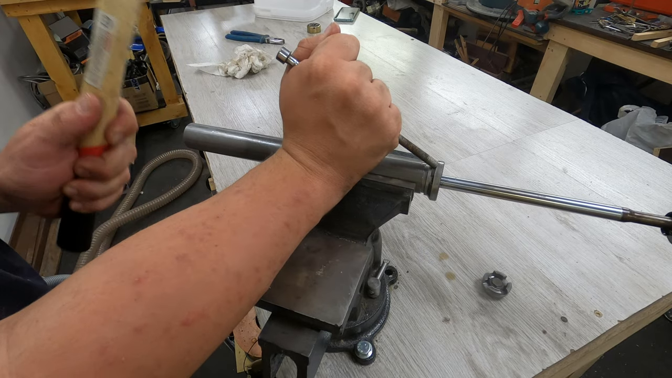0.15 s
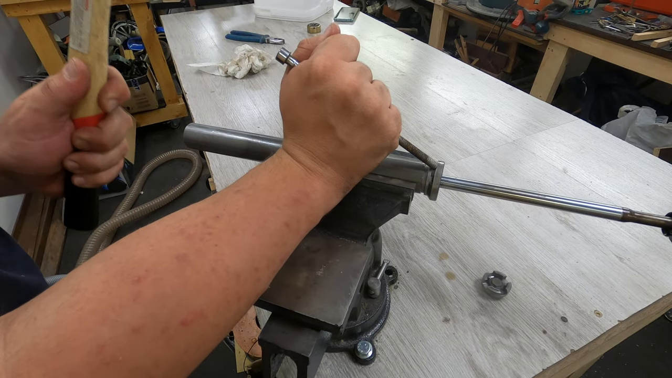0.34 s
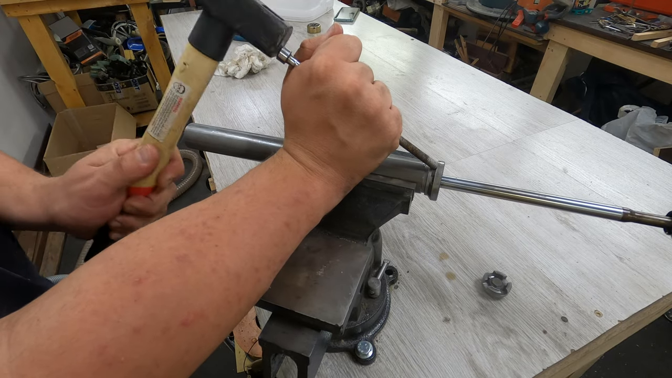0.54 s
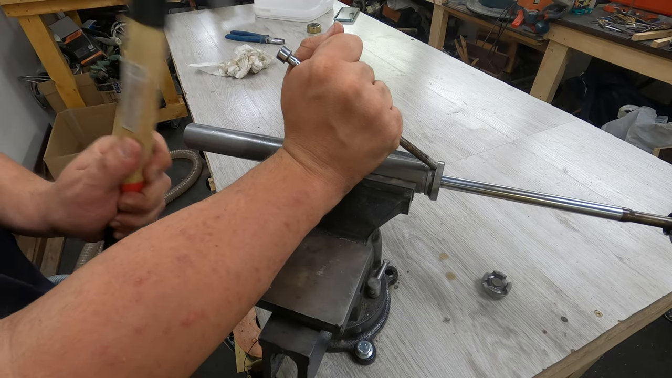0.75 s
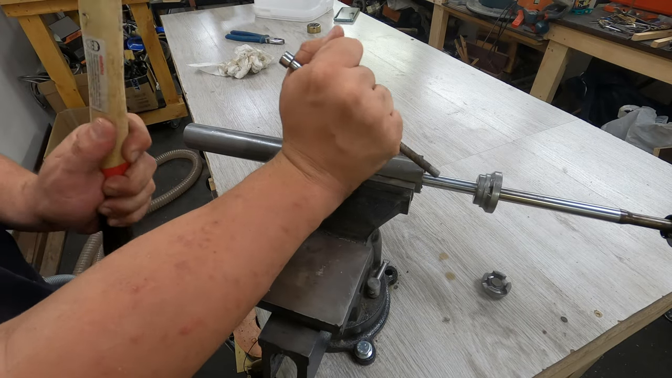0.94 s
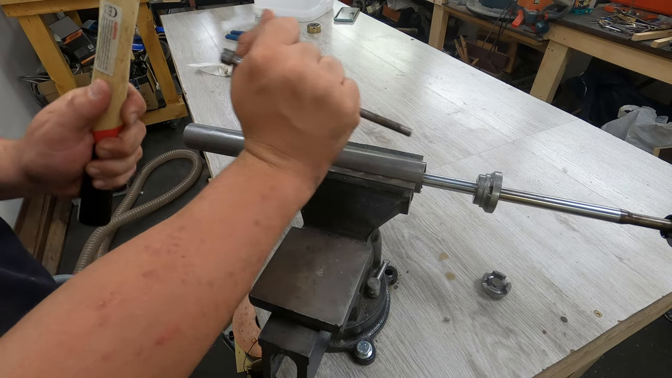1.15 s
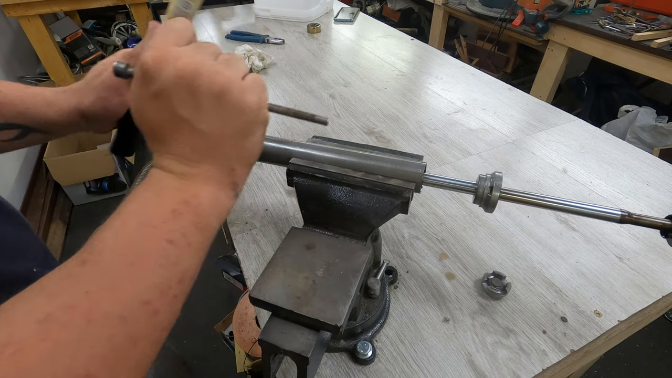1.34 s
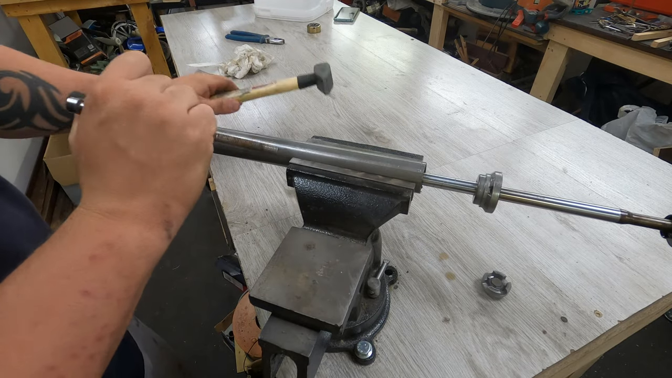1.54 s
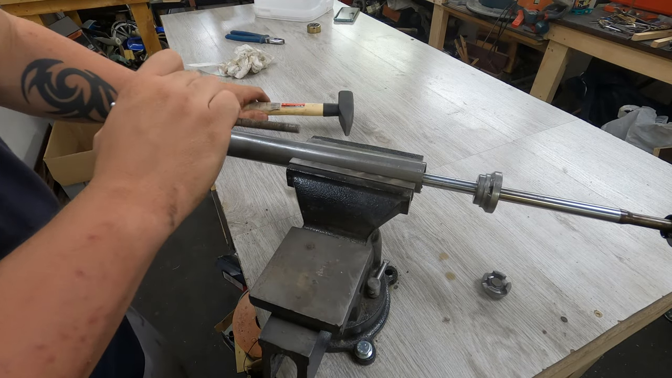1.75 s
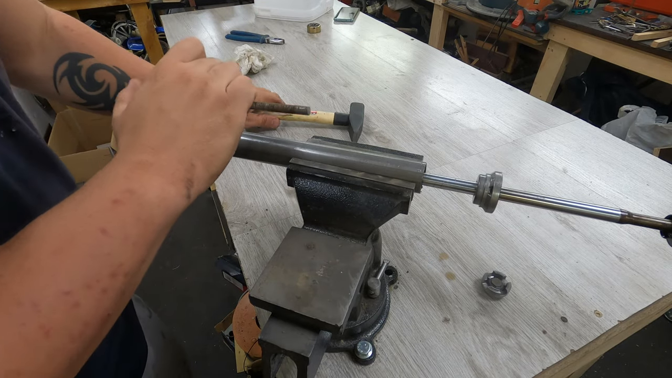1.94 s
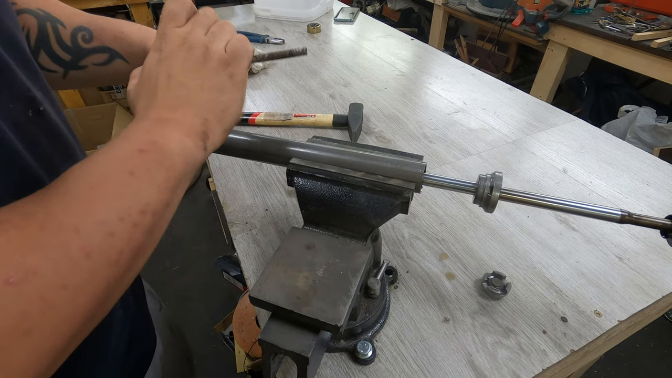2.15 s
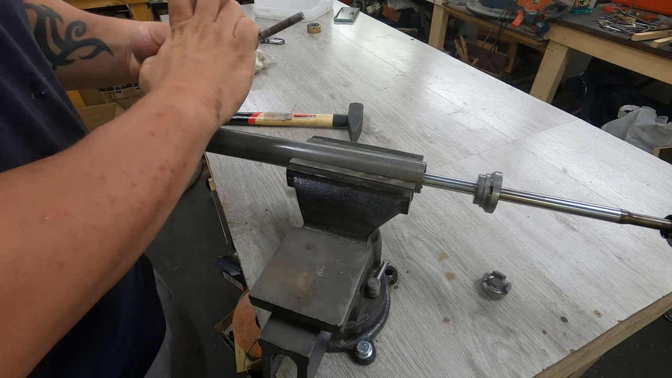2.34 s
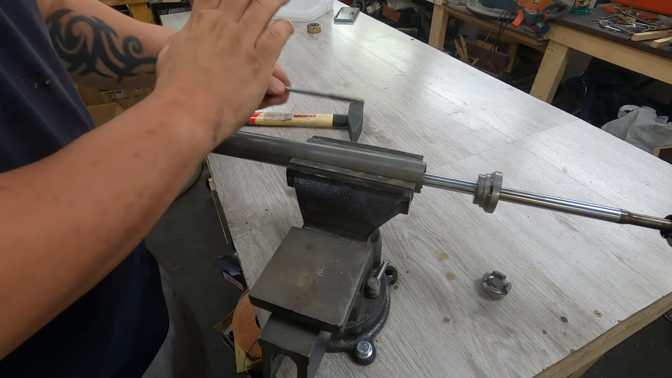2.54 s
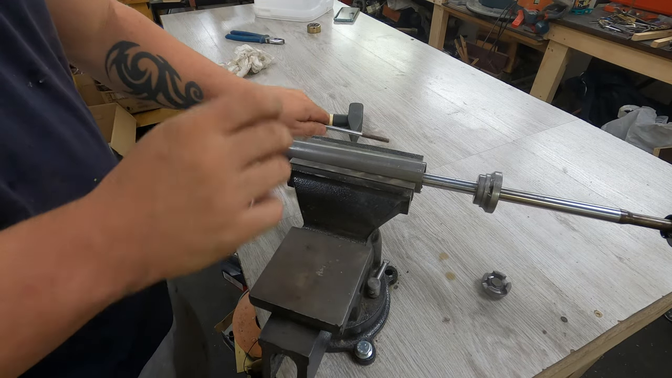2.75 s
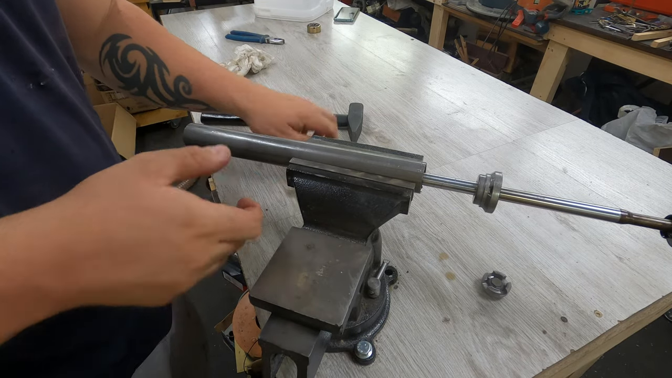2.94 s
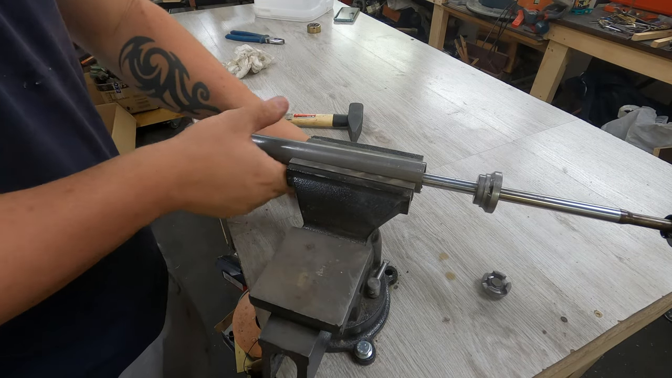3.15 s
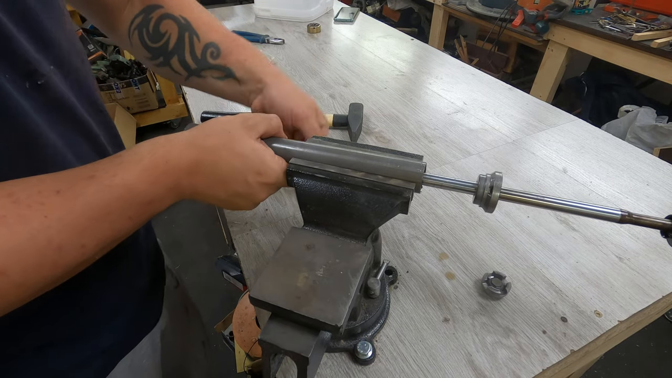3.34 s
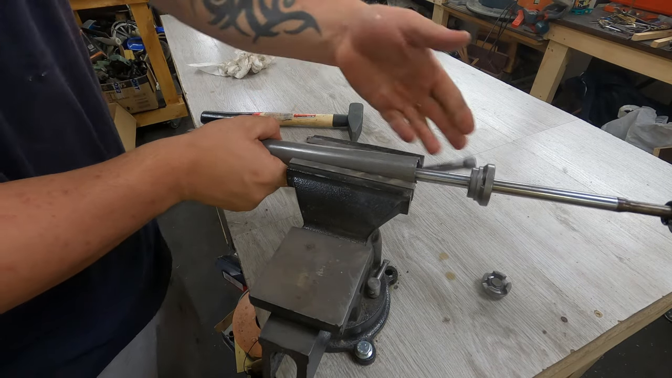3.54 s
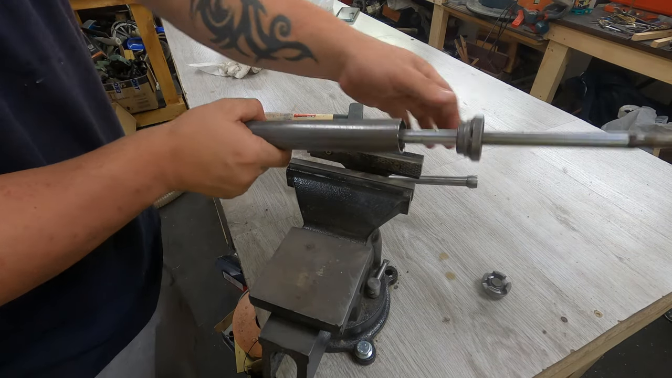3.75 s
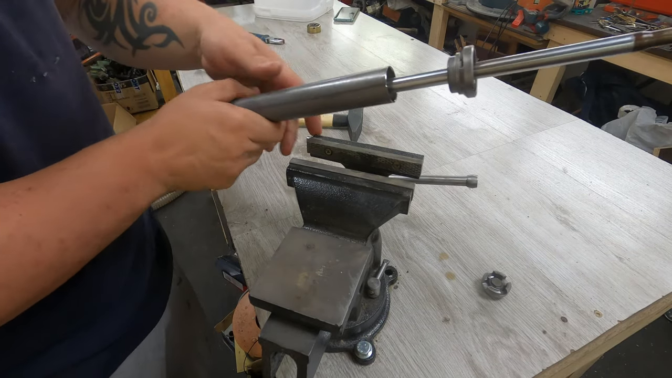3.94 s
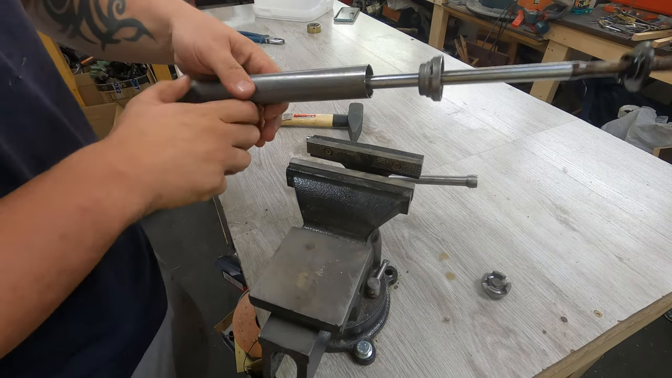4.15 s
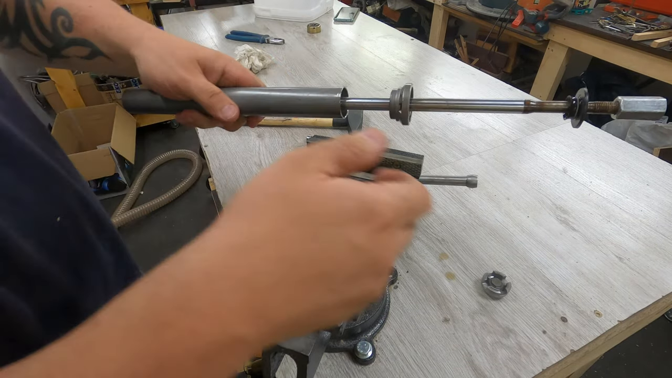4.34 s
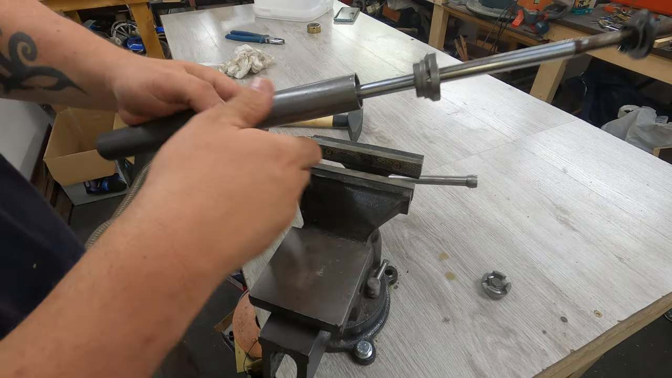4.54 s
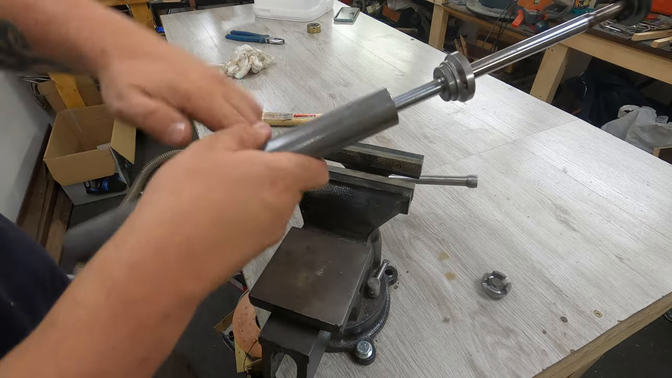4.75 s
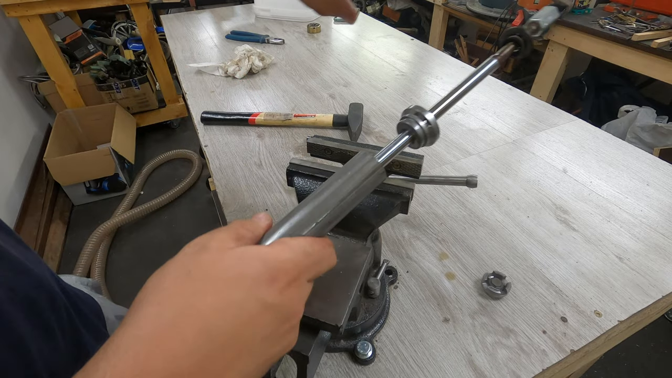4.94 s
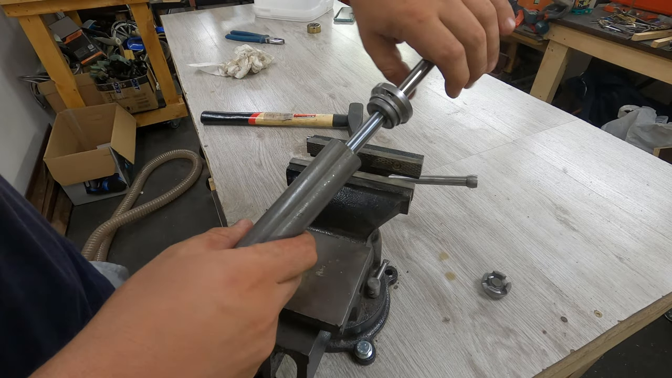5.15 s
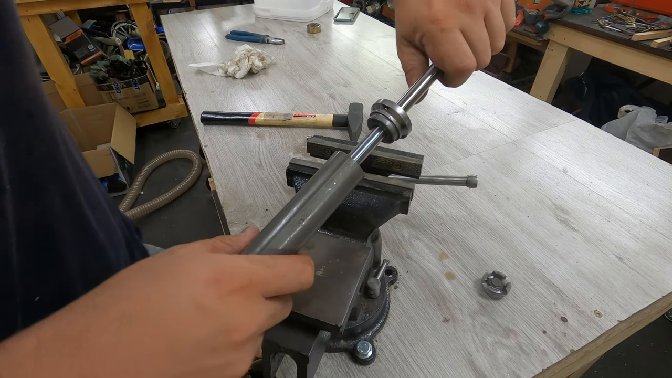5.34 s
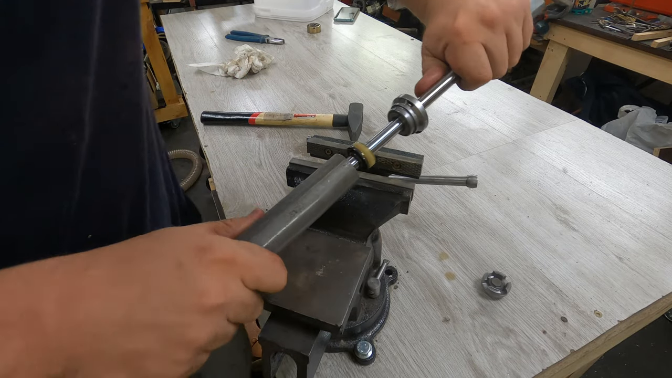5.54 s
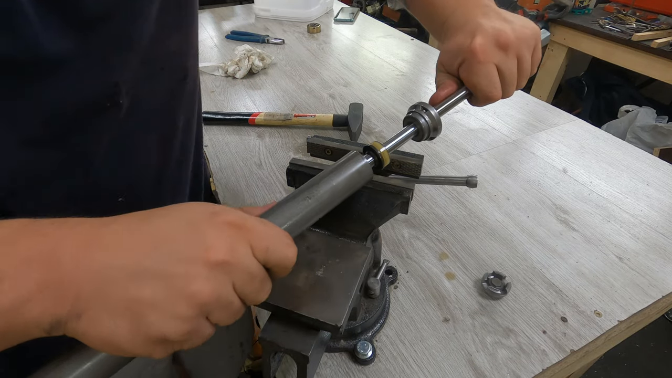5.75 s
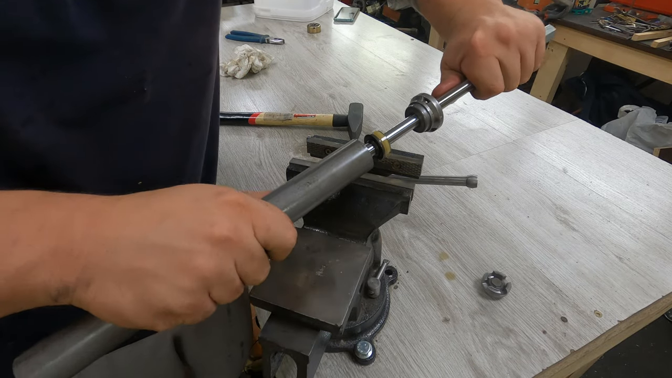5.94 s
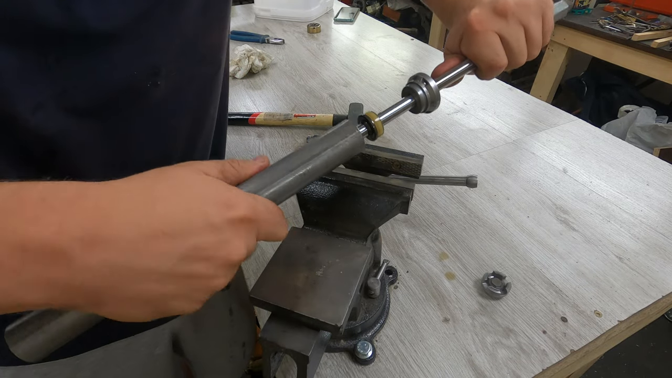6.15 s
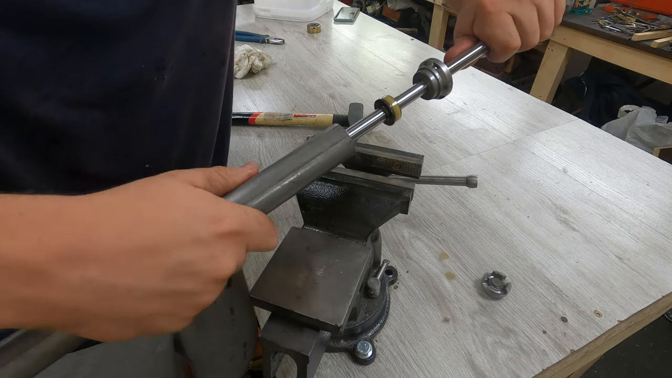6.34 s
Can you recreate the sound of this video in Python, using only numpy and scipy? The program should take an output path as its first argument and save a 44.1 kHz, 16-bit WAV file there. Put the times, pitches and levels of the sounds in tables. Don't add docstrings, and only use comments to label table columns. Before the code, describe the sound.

Close stereo in a small, hard-walled workshop with a low wavering hum and faint air hiss. The tail of a hammer blow opens the scene; a full crack of punch on steel tube lands at 0.13 s, a duller glancing one at 0.65 and another hard one at 0.89 with quick skips, each with steel ring, bench thud and brief room tail. At 1.9-2.1 the hammer shaft knocks down, then its head at 2.1 with small bounces. The punch clatters down at 2.9-3.1. Light handle knocks at 3.25 precede a gritty, rumbling scrape from the vise at 3.55-3.75. Hands then rub softly over steel with faint ticks and pings. A tiny high squeak comes around 5.1-5.3, while a muffled engine passes outside from about 5, strongest near 5.6. The rod's oily hiss swells at 5.84, briefly pulls again at 6.03 and fades, leaving quiet rubbing and hum.

```python
import sys
import numpy as np
from scipy import signal
from scipy.fft import rfft, irfft, next_fast_len
from scipy.io import wavfile

SR = 44100
rng = np.random.default_rng(int(sys.argv[2]) if len(sys.argv) > 2 else 0)


def bounce(signal):
    frames = np.transpose(np.atleast_2d(signal))
    limited = np.clip(frames, -1, 1)
    pcm = np.round(limited * 32767).astype(np.int16)
    wavfile.write(sys.argv[1], SR, pcm)


def convert_level_to_amplitude(level_db):
    exponent = np.asarray(level_db, float) / 20
    return 10 ** exponent


N = 286202
LEAD = 6000

# start in seconds, crack level in dB, then bench thud,
# low crack and steel ring in dB relative to the crack.
FIRST_BLOW = [
    (0.131, -15, 0.5, -14.5, 5),
    (0.629, -71.5, -8.5, -7.5, -9.5),
    (0.6392, -64.5, -7.5, -1, -13.5),
]
GLANCING_BLOWS = [
    (-0.051, -27.5, 1.5, -10, 4.8),
    (0.65, -18.5, -6, -12.5, 2.5),
]
LAST_BLOW = [
    (0.865, -64.5, -13.5, -12.5, -9.5),
    (0.875, -57.5, -5, 2, -3),
    (0.8856, -13.5, -4, -12, 3.5),
]
REBOUNDS = [
    (0.9082, -24.5, -12, -32, 5),
    (0.9105, -36, -13.5, -30.5, 6.5),
    (1.0105, -34, -31, -11, -2),
]
SHAFT_DOWN = [
    (1.8017, -63.5, -16, -7.5, -25.5),
    (1.9348, -66, 14, 3, 20),
    (1.9442, -23.5, 6, -3, 12),
    (1.9788, -29, 12, 3, 19),
    (1.9884, -42.5, -1, 18, 19.5),
    (2.0239, -37.5, 18.5, -18.5, 19.5),
    (2.0744, -49.5, 11.5, -5, 10),
]
HEAD_DOWN = [
    (2.1118, -16, -4, -5, 2.5),
    (2.1712, -24.5, -1, -2, 7.5),
    (2.177, -27, -6, 2, -7),
    (2.2081, -32, 4, 1, 12),
    (2.232, -38.5, -2.5, -1.5, 9.5),
]
PUNCH_DOWN = [
    (2.8841, -55, 7, -3.5, 18),
    (2.8955, -27.5, -4.5, -5.5, 5),
    (2.9558, -20, -5.5, -10.5, -19),
    (2.958, -15, -20, -6, -26),
    (3.0135, -24.5, -12.5, -11, -25),
    (3.0215, -21.5, -43, -4.5, -8.5),
    (3.027, -24, -9.5, -13, -22),
    (3.0495, -23.5, -30, -11, -30),
    (3.08, -32.5, -30, -14, -20),
]
HANDLE_KNOCKS = [
    (3.2252, -56, 7.5, 1, 6),
    (3.2584, -50, 3.5, 0, 14),
    (3.26, -47.5, -17, 5.5, 14.5),
]
ROD_TICKS = [
    (3.5535, -50, -30, 2, -10),
    (3.5711, -44.5, -28, -1.5, -8),
    (3.6325, -40, -19, 3, -17),
    (3.7205, -52.5, -22, -7, -1),
    (3.7575, -59, -30.5, -23, -10),
    (4.004, -65.5, -39.5, -9, -11),
    (4.2053, -56, -39, -21.5, -18),
]
COLLAR_TICKS = [
    (5.2312, -65.5, -9, -7, 17),
    (5.243, -68, -30, 2, 13),
    (5.2914, -73, -30, -3, 3),
    (5.3995, -56.5, -18, -8, -1),
    (5.6177, -49.5, -23, -21, -2.5),
    (6.0105, -51.5, -34, -22, 5),
    (6.2098, -64, -40, -20, -25),
]

# mode in Hz, level in dB, time to fall 60 dB in seconds.
BENCH = [(40.4, -13.5, 0.061), (96, -6, 0.073), (155, -9, 0.17), (175, -1.5, 0.1), (204.7, -3.5, 0.15),
         (233, -5.5, 0.1), (315, -2.5, 0.053), (456, -2, 0.014), (510, -10.5, 0.021)]
TUBE = [(1340, -50, 1.4), (2220, -31, .3), (4070, -40, .3), (4092, -29, .5), (5590, -32, .15),
        (7400, -28, .06)]
SKIPPED_STEEL = [(3400, -7.5, .03), (4600, 2, .025), (4716, -1.5, .03), (5640, -1.5, .02), (7110, -5, .015)]
HAMMER_SHAFT = [(509, 8, 0.017), (699, -25, 0.038), (747, -15, 0.033), (960, -10, 0.057), (1148, -13, 0.11),
                (1440, -9.5, 0.027), (2120, -31.5, .04)]
HAMMER_HEAD = [(573, -5.5, 0.091), (1090, -9.5, 0.073), (1670, -3, .1), (3900, -22, 0.36), (4310, 3, 0.01),
               (5170, -13.5, .08)]
PUNCH = [(2900, -9, .05), (5440, -3, .075), (9055, -17, .2), (9110, -18, .14), (13100, -28, .16),
         (15000, -39, .12)]
HANDLE = [(1798, -3, .04), (2450, 0, .03), (3380, -8, .02), (4440, -3, .025), (6000, -14, .02)]
ROD = [(2230, -6, .06), (4450, -9, .07), (5980, -12, .065)]
COLLAR = [(1500, -20, 0.024), (2580, 2.5, 0.019), (5000, -36, 0.022)]
JAWS = [(631, 4, 0.037), (910, -17.5, 0.079), (1257, 0, 0.038), (1445, -10, 0.045), (2140, -7, 0.065),
        (2650, -18, 0.06), (4100, -11, 0.037)]

# centre in Hz, width in Hz, boost in dB.
TINT_FIRST = [(1070, 150, 9), (2130, 500, 6.5), (4100, 300, 5), (5300, 460, 2), (7600, 400, 4),
              (10000, 400, 7.5)]
TINT_GLANCING = [(1320, 120, 6.9), (2116, 170, 5), (3482, 300, 2), (4410, 300, 2), (5500, 400, 4.7),
                 (7240, 840, 5.7)]
TINT_LAST = [(1690, 300, 3), (2100, 130, 3), (3300, 400, 2.6), (4600, 500, 2.5), (5240, 500, 3),
             (7400, 310, 8.8)]
TINT_HEAD = [(1760, 83, 6.2), (2450, 250, 3), (2950, 250, 2.5), (3780, 708, 9.8), (5440, 370, 3.6),
             (9370, 500, 6.6)]
TINT_PUNCH = [(1023, 170, 1.2), (1564, 163, 6.5), (2100, 160, 1.84), (3000, 980, 6.8), (4300, 1000, 1),
              (5500, 410, 2.5)]

# start in seconds, Hz, dB, swell
# in ms.
PINGS = [(2.962, 9070, -46, 19), (3.03, 9080, -50, 16), (3.085, 9070, -51.5, 14.5),
         (3.0275, 2820, -20, 1.5), (3.2615, 1363, -29.5, 5.3), (3.57, 2140, -45, 11),
         (3.565, 1264, -43, 4.7), (3.662, 2650, -40, 3.6), (3.668, 3080, -44, 2.9), (3.72, 4800, -52, 3.4),
         (3.73, 2450, -52, 1.7), (3.757, 3960, -59.5, 4.5), (3.765, 2340, -62, 5), (3.757, 6550, -61, 4),
         (4.7, 3930, -57, 4.5), (4.702, 4600, -59, 4.4), (4.725, 4470, -61, 8.7), (4.746, 5920, -58.5, 5.5),
         (4.758, 2280, -64, 4.3), (4.774, 2230, -50.5, 3.1), (4.8, 5980, -66, 9.4), (4.82, 6000, -63, 6.9),
         (4.822, 4480, -67, 7.4), (5.229, 4900, -59, 2), (5.243, 4300, -61, 3.6), (5.238, 1520, -57, 3),
         (5.288, 1550, -60, 2.3)]
# start in seconds, Hz, dB, swell in ms.
BUMPS = [(.652, 318.7, -17.5, 5.8), (1.98, 200.9, -20, 6.5), (1.998, 204, -18, 6), (2.022, 175, -14.5, 8),
         (2.075, 118, -25.5, 7.1), (2.112, 510, -18, 5), (2.172, 507, -26, 6.6), (2.896, 539, -27.5, 3.8),
         (2.965, 333, -22, 3.6), (3.685, 602, -44, 9.5), (3.72, 960, -48, 6.6), (3.568, 229, -34, 6.6),
         (3.612, 253, -33, 3.2), (3.652, 193.5, -29, 5.7), (3.666, 242, -30, 3.5)]
# delay in seconds, Hz, dB relative to the blow, swell in ms.
ROCKS = [
    (.028, 172, -12, 6),
    (.062, 181, -9, 6),
    (0.099, 172, -14.5, 7),
]
# start in seconds, level in dB.
ROCKED_BY = [
    (-.051, -27.5),
    (.131, -11),
    (.65, -16),
    (0.8862, -13),
]

# peak in seconds, bench rumble in dB, rise and fall in seconds.
DRAG = [
    (3.552, -34.5, 0.0094, 0.11),
    (3.62, -27.5, 0.041, 0.074),
    (3.7, -32.5, 0.042, 0.032),
]
# peak in seconds, rasp in dB, rise and fall in seconds.
GRIND = [
    (3.555, -41.5, 0.0062, 0.085),
    (3.624, -32.5, 0.035, 0.028),
    (3.69, -42.5, 0.044, 0.037),
]
# Hz, dB per Hz.
RASP_COLOUR = [(410, -0.5), (700, -18.5), (922, 2.5), (1730, -7.5), (2710, -8), (3480, -23), (5680, -17.5),
               (12700, -91), (14000, -70)]

# peak in seconds, hiss in dB, rise and fall in seconds, bright top in dB re hiss.
RUB = [(1.804, -73, 0.0076, 0.16, -23), (3.40, -76, 0.12, 0.13, -24), (3.49, -64, 0.044, 0.072, -14),
       (3.6, -55, .06, 0.14, -18), (3.9, -77, .07, 0.063, -34), (4.04, -65, 0.056, 0.4, -12.5),
       (4.26, -61, 0.17, 0.1, -13), (4.4, -72, 0.13, 1, -24), (4.698, -60, 0.017, 0.38, -15.5),
       (4.872, -68, 0.43, 0.006, -9), (5.1, -69, 0.19, 0.42, -33), (5.23, -81, .02, 0.052, -29),
       (5.48, -58, 0.2, 0.15, -17), (5.64, -62.5, 0.023, 0.28, -25), (5.85, -56, 0.048, 0.57, -27),
       (6.01, -57.5, 0.3, 0.052, -26), (6.419, -70, 0.083, 0.11, -10.5)]
# Hz, dB per Hz.
RUB_COLOUR = [(530, -35.5), (900, -32), (1100, -13), (1870, -3), (2230, -4.5), (2430, -7), (4590, -3.5),
              (5000, -6), (9000, -14), (11700, -46), (19800, -120)]

# time in seconds, speed as a level in dB.
SLIDE = [
    (5.612, -87),
    (5.64, -63),
    (5.74, -53),
    (5.836, -42),
    (5.95, -47.5),
    (5.99, -55.5),
    (6.03, -52),
    (6.05, -57),
    (6.116, -70),
    (6.2, -78),
]
# Hz, dB per Hz.
SLIDE_COLOUR = [(240, -8.5), (400, -17), (600, -16), (827, -15.5), (1040, -7), (1500, -2.5), (1900, -2),
                (2600, -7), (4620, -16.5), (5640, -19), (12000, -49), (22000, -120)]
# time in seconds, pitch in Hz, level in dB.
SQUEAK = [
    (5.1, 8700, -108),
    (5.112, 9418, -103),
    (5.156, 8650, -101),
    (5.322, 10100, -91),
    (5.34, 10093, -102),
]

# time in seconds, firing rate in Hz, first order in dB.
ENGINE = [
    (4.85, 56.6, -66.5),
    (5.11, 70.76, -44.5),
    (5.19, 69.5, -50.5),
    (5.31, 73.94, -43.5),
    (5.57, 74.47, -34.5),
    (5.65, 83.86, -42),
    (5.83, 79.2, -41.5),
    (6.2, 73.77, -46.5),
    (6.3, 64.73, -58),
    (6.49, 62.6, -45),
]
# time in seconds, first order change in dB, second order level in dB.
LIFTS = [
    (5.3, -33.5, -69),
    (5.552, -20, -50),
    (6.284, 4, -47.5),
    (6.52, -7, -51.5),
]

# peak of a swell in seconds, dB, rise and fall in seconds.
HUM = [
    [(.23, -48.5, 0.28, 0.13), (.82, -42.5, 0.072, .25), (1.72, -45, .36, 0.53), (2.28, -50, 0.22, .4),
     (2.69, -44.5, 0.94, 0.27), (3.2, -47.5, 0.26, 0.53), (3.55, -58.5, 0.35, .5), (4.45, -60, 0.36, 0.64),
     (4.9, -47, 0.19, 0.96), (5.35, -49, 0.091, 0.48), (5.68, -50, 0.6, 0.69), (6.07, -53, 0.44, 0.15)],
    [(0, -47, 0.087, 0.19), (.36, -57, 0.15, 0.23), (.81, -52.5, .12, 0.27), (1.64, -55, 0.11, 0.077),
     (2.08, -42.5, 0.085, 0.33), (2.6, -53.5, .5, 0.42), (3.33, -44.5, 0.29, 0.19), (4.0, -51, 0.78, 0.65),
     (4.9, -54.5, 0.26, .4), (5.3, -59.5, 0.26, 0.35), (6.07, -58, 0.24, 0.48)],
]
HUM_HZ = [44.5, 96.5]
# time in seconds, hiss in dB.
AIR = [
    (0, -73),
    (.5, -79),
    (1.8, -73.5),
    (3.4, -72),
    (5.8, -68.5),
    (6.49, -74.5),
]
# Hz, dB per Hz.
RUMBLE_COLOUR = [(8.8, -29.5), (15, -2.5), (32, -4.5), (48, -4.5), (70, -8.5), (102, -11.5), (128, -21.5),
                 (234, -22.5), (261, -23), (600, -48), (780, -78.5), (1320, -120)]
HISS_COLOUR = [(240, -37.5), (400, -6.5), (481, -3.5), (838, -15.5), (1020, -2.5), (1200, -5.5),
               (1300, -6.5), (1400, -5), (2650, -15), (7500, -24.5), (12000, -46), (15600, -77),
               (22000, -120)]

# Hz, correlation.
LIKENESS = [(60, 1), (150, 1.0), (380, 0.96), (950, 0.58), (2380, 0.68), (5980, 0.067), (15000, -1)]
# Hz, time to fall 60 dB in seconds.
ROOM_T60 = [(60, 0.68), (250, 0.29), (1000, 0.3), (4000, 0.31), (8000, 0.32), (11500, .25), (16000, 0.16)]
# Hz, dB.
ROOM_COLOUR = [(60, -3), (250, 13), (1000, 8), (3000, 6), (7600, 1), (8600, 1.5), (16000, -10)]
BANDS = 22 * 2 ** (np.arange(29) / 3)


def rms_one(x):
    return x / np.sqrt(np.mean(x ** 2) + 1e-20)


def in_time(rows, silent=False):
    s, *columns = np.transpose(rows)
    t = np.arange(N) / SR
    outside_s = np.maximum(np.maximum(s[0] - t, t - s[-1]), 0)
    fall_db = 800 * outside_s * silent
    return [np.interp(t, s, column) - fall_db for column in columns]


def at_hz(points, hz):
    point_hz, value = np.array(points)[:, :2].T
    return np.interp(np.log(hz), np.log(point_hz), value)


def band(x, low_hz, high_hz):
    edges = [low_hz, min(high_hz, .45 * SR)]
    return signal.sosfilt(signal.butter(2, edges, "band", fs=SR, output="sos"), x)


def soften(x, hz):
    return signal.sosfilt(signal.butter(2, min(hz, .45 * SR), fs=SR, output="sos"), x)


def resonator(hz, decay):
    return [1, -2 * decay * np.cos(2 * np.pi * hz / SR), decay * decay]


def tint(x, peaks):
    for hz, width_hz, boost_db in peaks:
        r = np.exp(-np.pi * abs(width_hz) / SR)
        side = (1 - r * r) / 2
        x = x + (convert_level_to_amplitude(boost_db) - 1) * signal.lfilter([side, 0, -side], resonator(hz, r), x)
    return x


def ring(clicks, hz, t60):
    decay = convert_level_to_amplitude(-60 / (t60 * SR))
    return signal.lfilter([0, np.sin(2 * np.pi * hz / SR)], resonator(hz, decay), clicks + 1e-18)


def drift(rate):
    r = np.exp(-80 * np.pi * rate / SR)
    white = rng.standard_normal(N // 40 + 2002)
    slow = rms_one(signal.lfilter([1], [1, -2 * r, r * r], white)[2000:])
    return np.interp(np.arange(N) / 40, np.arange(len(slow)), slow)


def grains(per_s, spread_db):
    born = rng.random((2, N)) < per_s / SR
    size_db = spread_db * np.minimum(rng.exponential(1, (2, N)), 4)
    return born * convert_level_to_amplitude(size_db) * rng.standard_normal((2, N))


def strokes(rows):
    s, db, rise_s, fall_s = np.transpose(rows)[:4, :, None]
    t = np.arange(0, N + 32, 32) / SR
    away = np.maximum((s - t) / np.abs(rise_s), (t - s) / np.abs(fall_s))
    power = np.sum(convert_level_to_amplitude(2 * (db - 15 * away)), 0)
    return np.interp(np.arange(N) / SR, t, np.sqrt(power))


def coloured(white, spectrum, likeness=1):
    length = white.shape[1]
    size = next_fast_len(length)
    hz = np.maximum(np.fft.rfftfreq(size, 1 / SR), 1)
    alike = np.clip(likeness * at_hz(LIKENESS, hz), -1, 1)
    mid, side = rfft(white, size) * convert_level_to_amplitude(at_hz(spectrum, hz))
    pair = np.sqrt(1 + alike) * mid + np.sqrt(1 - alike) * side * [[1], [-1]]
    return rms_one(irfft(pair, size)[:, :length])


def knocks(rows, modes, colour, crack_ms, top_db):
    s, db, thud_db, body_db, ring_db = np.transpose(rows)
    at = np.round(s * SR).astype(int) + LEAD
    uneven_db = 2.0 * rng.standard_normal((len(at), 16))
    longest_s = .3 + max(t60 for *_, t60 in modes)
    first, last = at.min(), min(at.max() + int(SR * longest_s), N + LEAD)
    white = rng.standard_normal(N + LEAD)[first:last]

    def train(level_db):
        clicks = 1e-12 * white
        clicks[at - first] = convert_level_to_amplitude(level_db)
        return clicks

    def crack(shape):
        total = 0
        for rel_db, low, high in [(body_db + 19.5, 500, 2600), (9, 2600, 6800), (top_db + 14.5, 6800, 15000)]:
            part = shape(train(db + rel_db))
            total = total + band(band(part, low, high), low, high)
        return tint(total, colour)

    def snap_and_crunch(clicks):
        r = np.exp(-2000 / (crack_ms * SR))
        swell = signal.lfilter([np.e * (1 - r)], [1, -2 * r, r * r], clicks)
        return convert_level_to_amplitude(3.5) * clicks + white * swell

    steel, thud = 0, 0
    for k, (hz, mode_db, t60) in enumerate(modes):
        steel = steel + (-1) ** k * ring(train(db + ring_db + mode_db + uneven_db[:, k]), hz, t60)
    for k, (hz, mode_db, t60) in enumerate(BENCH):
        thud = thud + ring(train(db + thud_db + 0.5 + mode_db + uneven_db[:, 7 + k]), hz, t60)
    steel = soften(steel, 2.0 * modes[-1][0])
    thud = np.roll(soften(thud, hz=1540), int(.0025 * SR))
    direct = soften(crack(snap_and_crunch), hz=10300) + steel + thud
    around = convert_level_to_amplitude(18.5) * crack(lambda clicks: clicks) + convert_level_to_amplitude(-15.0) * steel + convert_level_to_amplitude(-2.0) * thud
    return np.pad([direct, around], [(0, 0), (first, N + LEAD - last)])


def pings(rows):
    out, t = np.zeros(N + LEAD), np.arange(SR // 8) / SR
    for s, hz, db, swell_ms in rows:
        u = t * 1000 / abs(swell_ms)
        at = int(s * SR) + LEAD
        out[at:at + len(t)] += convert_level_to_amplitude(db) * u * np.exp(1 - u) * np.sin(2 * np.pi * hz * t)
    return out


def touches_and_bumps():
    rocks = [(s + delay_s, hz, db + rel_db, swell_ms)
             for s, db in ROCKED_BY for delay_s, hz, rel_db, swell_ms in ROCKS]
    unsteady_db = 3.1 * np.pad(drift(120), (LEAD, 0))
    return pings(PINGS) * convert_level_to_amplitude(unsteady_db) + pings(BUMPS + rocks)


def drag():
    catches = grains(900, spread_db=1.5)[0]
    rumble = rms_one(sum(convert_level_to_amplitude(db) * ring(catches, hz, 0.22 * t60) for hz, db, t60 in BENCH[1:]))
    jaws = rms_one(sum(convert_level_to_amplitude(db) * ring(catches, hz, t60) for hz, db, t60 in JAWS))
    rasp = coloured(grains(3500, spread_db=2.8), RASP_COLOUR, likeness=2.1)
    return convert_level_to_amplitude(-3.5) * strokes(DRAG) * rumble + convert_level_to_amplitude(-1.0) * strokes(GRIND) * (rasp + convert_level_to_amplitude(-5.0) * jaws)


def hands():
    light = strokes([(s, db + top_db, rise_s, fall_s) for s, db, rise_s, fall_s, top_db in RUB])
    touch = grains(10000, spread_db=1.0)
    top_band = signal.butter(6, [8200, 13300], "band", fs=SR, output="sos")
    top = rms_one(signal.sosfilt(top_band, touch))
    wake = rms_one(sum(convert_level_to_amplitude(db + 3.5 * drift(6)) * ring(touch[0], hz, t60) for hz, db, t60 in ROD))
    hiss = strokes(RUB) * coloured(touch, RUB_COLOUR)
    return convert_level_to_amplitude(1.1 * drift(29)) * (hiss + light * (top + convert_level_to_amplitude(-3) * wake))


def slide():
    level_db = in_time(SLIDE, silent=True)[0] + 0.41 * drift(33)
    return convert_level_to_amplitude(level_db) * coloured(grains(8000, spread_db=-0.5), SLIDE_COLOUR)


def squeak():
    level_db = in_time(SQUEAK, silent=True)[1] + 6 + 3.5 * drift(40)
    hz = in_time(SQUEAK)[0] * (1 + .012 * drift(150))
    return convert_level_to_amplitude(level_db) * np.sin(2 * np.pi * np.cumsum(hz) / SR)


def engine():
    hz, level_db = in_time(ENGINE)[0], in_time(ENGINE, silent=True)[1]
    t = np.arange(N) / SR
    lift_s, bark_lead_s, bark_s = 0.032, 0.02, 0.075
    drop_db = sum(db * np.maximum(1 - abs(t - s) / lift_s / 2, 0) for s, db, _ in LIFTS)
    barks = strokes([(s - bark_lead_s, db, bark_s, bark_s) for s, _, db in LIFTS])
    second = convert_level_to_amplitude(level_db - 25) + barks
    turn = 2 * np.pi * np.cumsum(hz) / SR + [[.2], [-.2]]
    return np.sqrt(2) * (convert_level_to_amplitude(level_db + drop_db) * np.sin(turn) + second * np.sin(2 * turn))


def background():
    hum = 0
    for swells, hz in zip(HUM, HUM_HZ):
        wavering_hz = hz * (1 + 0.034 * drift(1))
        turn = 2 * np.pi * np.cumsum(wavering_hz) / SR + [[.25], [-.25]]
        hum = hum + strokes(swells) * convert_level_to_amplitude(3.0 + 0.53 * drift(7.2)) * np.sin(turn)
    rumble = convert_level_to_amplitude(-51) * coloured(rng.standard_normal((2, N)), RUMBLE_COLOUR, likeness=0.96)
    hiss_db = in_time(AIR)[0] + .8 * drift(8)
    return hum + rumble + convert_level_to_amplitude(hiss_db) * coloured(rng.standard_normal((2, N)), HISS_COLOUR)


def workshop(x, gap_ms=1.67):
    t = np.arange(int(.9 * SR)) / SR
    white = rfft(coloured(rng.standard_normal((2, len(t))), ROOM_COLOUR))
    step = 3 * np.log2(np.maximum(np.fft.rfftfreq(len(t), 1 / SR), 1) / BANDS[0])
    tail = 0
    for k, hz in enumerate(BANDS):
        one_band = irfft(white * np.clip(1 - abs(step - k), 0, 1), len(t))
        tail = tail + one_band * convert_level_to_amplitude(-60 * t / at_hz(ROOM_T60, hz))
    tail = tail * np.clip(t * 1000 / gap_ms - 1, 0, 1)
    tail = tail / np.sqrt(np.sum(tail ** 2) / 2)
    return signal.fftconvolve(x[None], tail)[:, :len(x)]


def scene():
    near = touches_and_bumps()
    sent = convert_level_to_amplitude(-20) * near
    # contacts, body, tint, crack in ms, top in dB, send to the room in dB
    for rows, modes, colour, crack_ms, top_db, wet_db in [
            (FIRST_BLOW, TUBE[1:], TINT_FIRST, 2.1, -7, -1.3),
            (GLANCING_BLOWS, TUBE, TINT_GLANCING, 2.1, -18, -1.3),
            (LAST_BLOW, TUBE, TINT_LAST, 2.1, -8, -2.3),
            (REBOUNDS, SKIPPED_STEEL, TINT_LAST[3:], 2.6, -27, -6),
            (SHAFT_DOWN, HAMMER_SHAFT, [(920, 750, 5.5), (2200, 790, -2)], 1.3, -27, -4.5),
            (HEAD_DOWN, HAMMER_HEAD, TINT_HEAD, 1.3, -31, -3.5),
            (PUNCH_DOWN, PUNCH, TINT_PUNCH, 1.4, -33, -1.3),
            (HANDLE_KNOCKS, HANDLE, [], 2.2, -40, -2),
            (ROD_TICKS, ROD, [], 1.2, -25, -4),
            (COLLAR_TICKS, COLLAR, [], 1.3, -30, -5)]:
        direct, around = knocks(rows, modes, colour, crack_ms, top_db)
        near = near + direct
        sent = sent + convert_level_to_amplitude(wet_db) * around
    scrape = drag()
    sent[LEAD:] += convert_level_to_amplitude(-6) * scrape[0]
    left = signal.lfilter([.15, .6, .2], [1, -.2], near)
    struck = (np.array([left, near]) + workshop(sent))[:, LEAD:]
    return struck + scrape + hands() + slide() + squeak() + engine() + background()


def roll_off(x):
    return signal.sosfilt(signal.butter(12, 16920, fs=SR, output="sos"), x)


def record(dry, knee_db=-30, share=0.41, release_db_s=85, attack_ms=0.053):
    level_db = 20 * np.log10(np.abs(dry).max(0) + 1e-6)
    ramp = release_db_s * np.arange(N) / SR
    held_db = np.maximum.accumulate(level_db + ramp) - ramp
    cut_db = share * np.maximum(held_db - knee_db, 0)
    r = np.exp(-1000 / (attack_ms * SR))
    cut_db = signal.lfilter([1 - r], [1, -r], cut_db, zi=[r * cut_db[200]])[0]
    balance_db = np.array([[.2], [-.2]])
    top_cut = signal.cheby2(8, 40, 17300, fs=SR, output="sos")
    return roll_off(signal.sosfilt(top_cut, dry * convert_level_to_amplitude(balance_db - cut_db)))


dry = scene()
out = record(dry)
bounce(out)
```